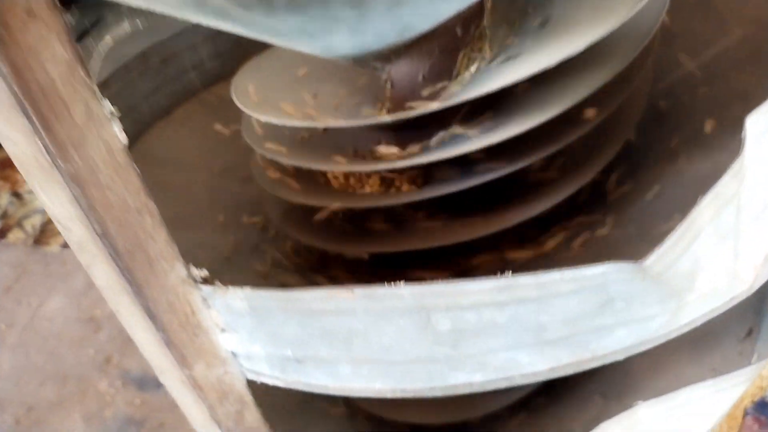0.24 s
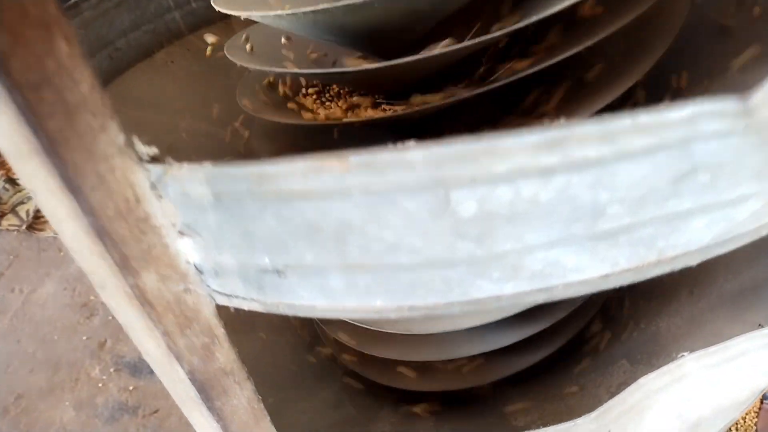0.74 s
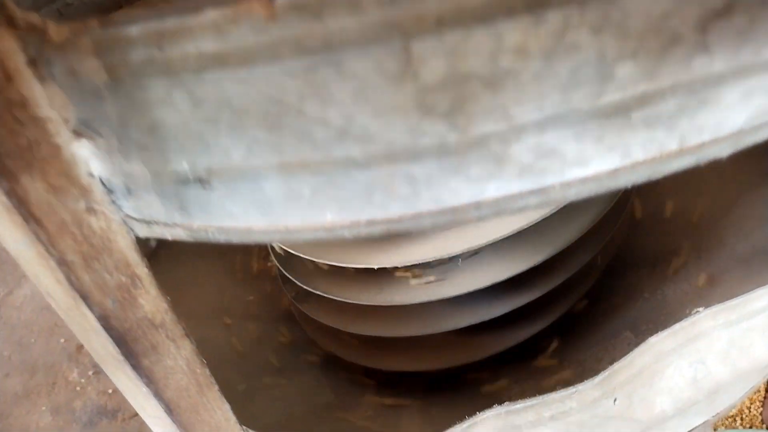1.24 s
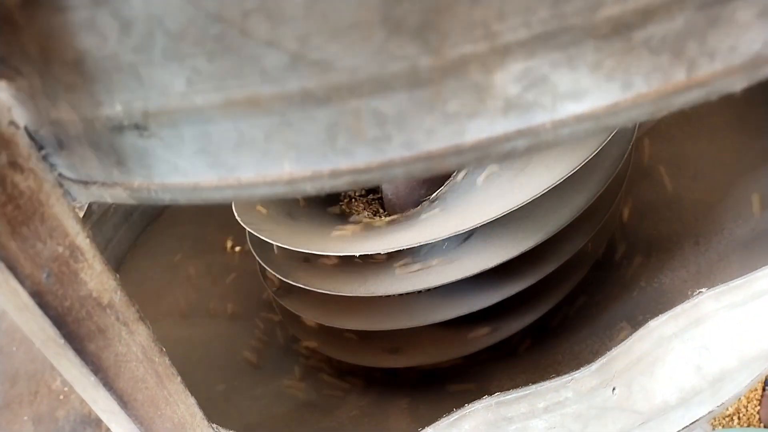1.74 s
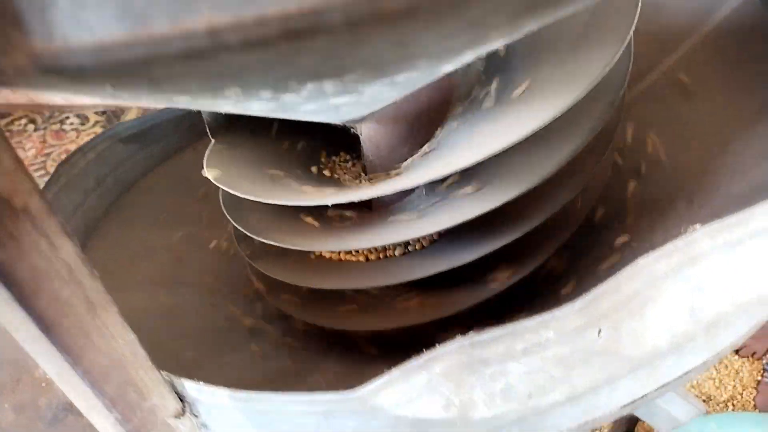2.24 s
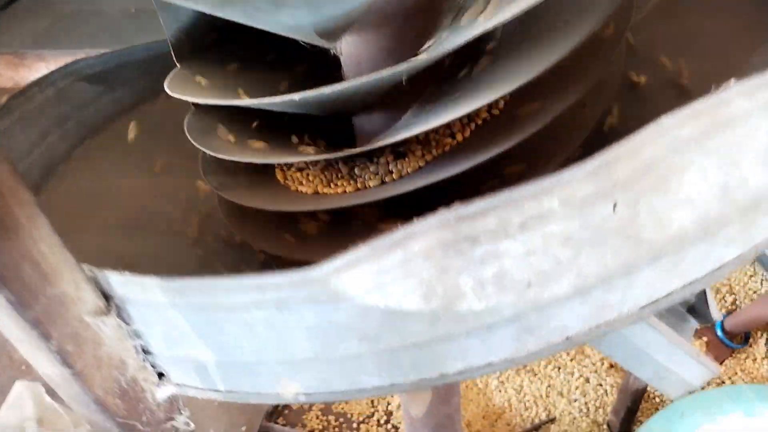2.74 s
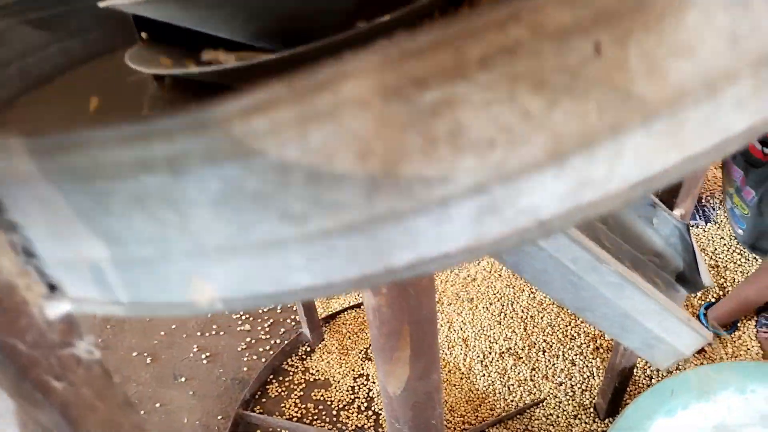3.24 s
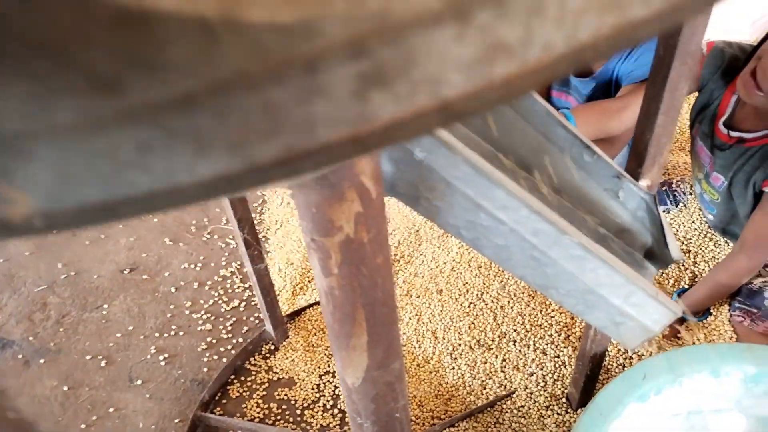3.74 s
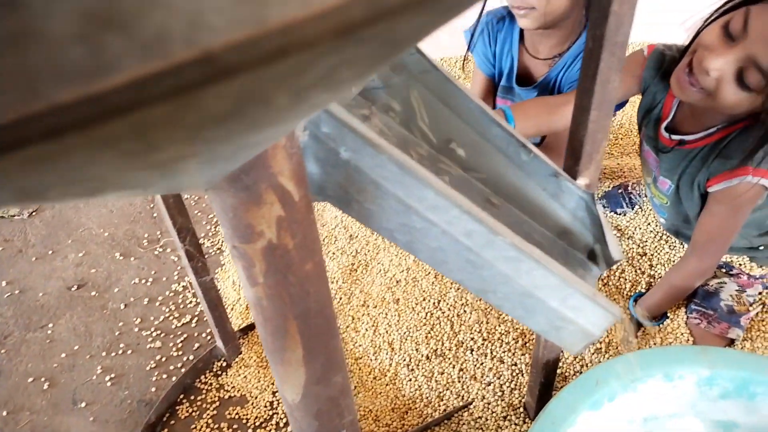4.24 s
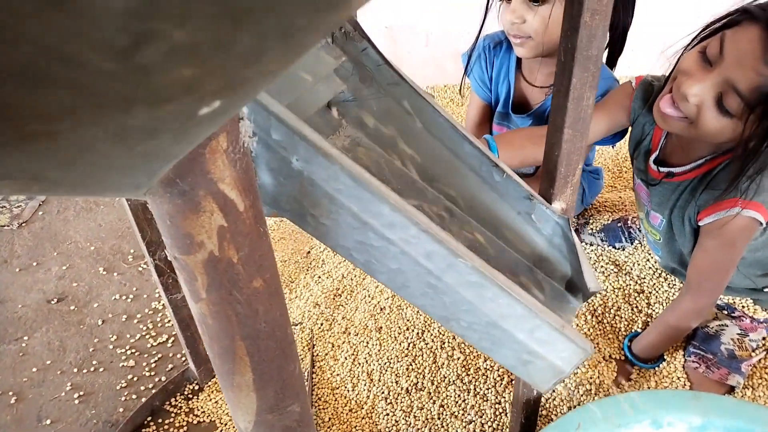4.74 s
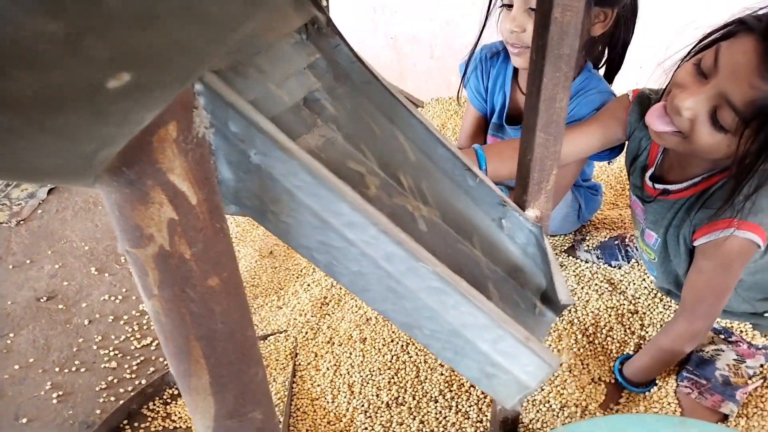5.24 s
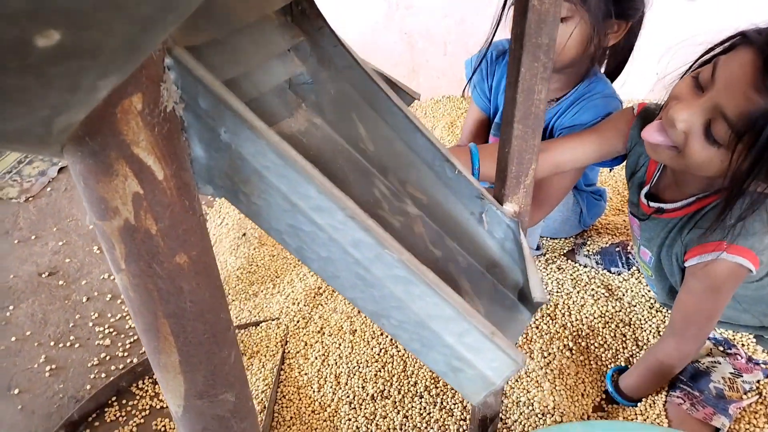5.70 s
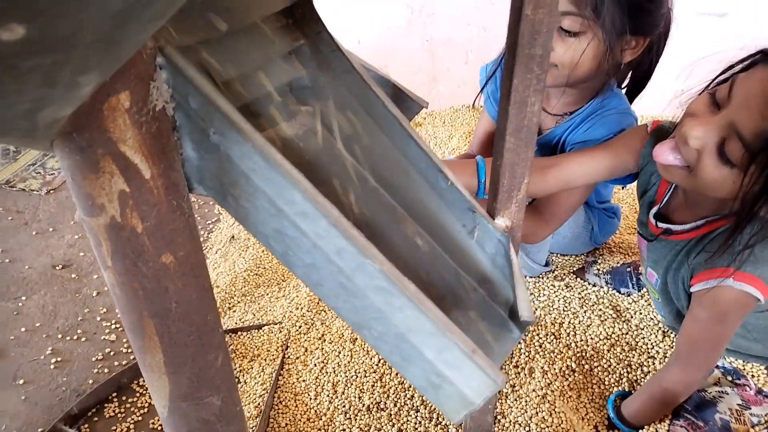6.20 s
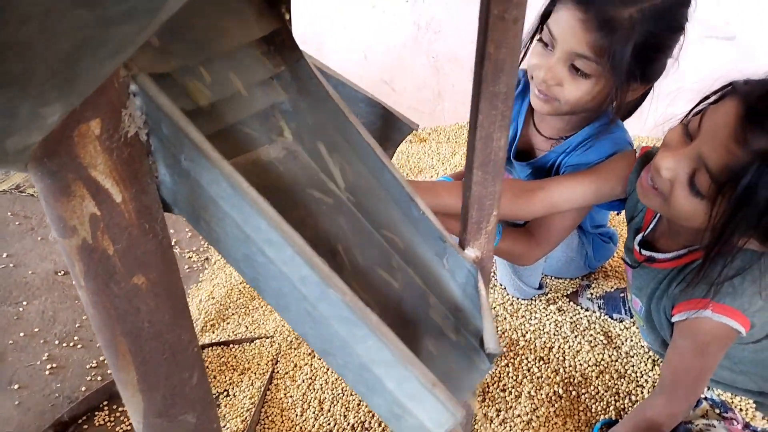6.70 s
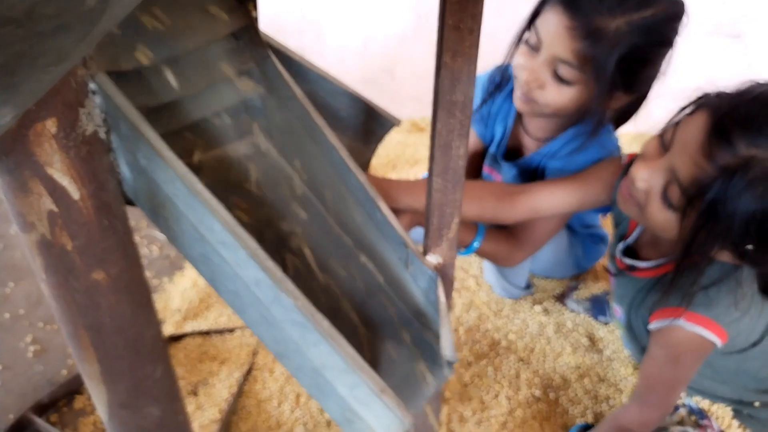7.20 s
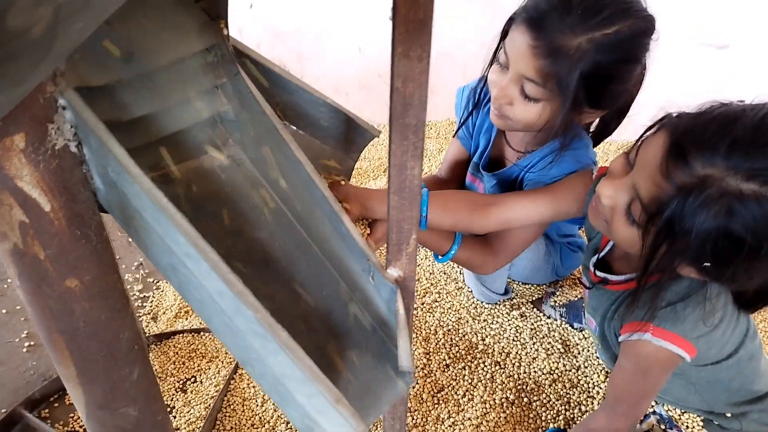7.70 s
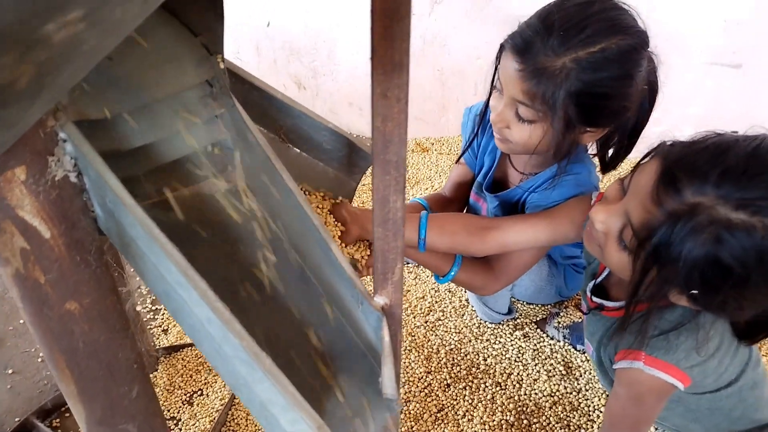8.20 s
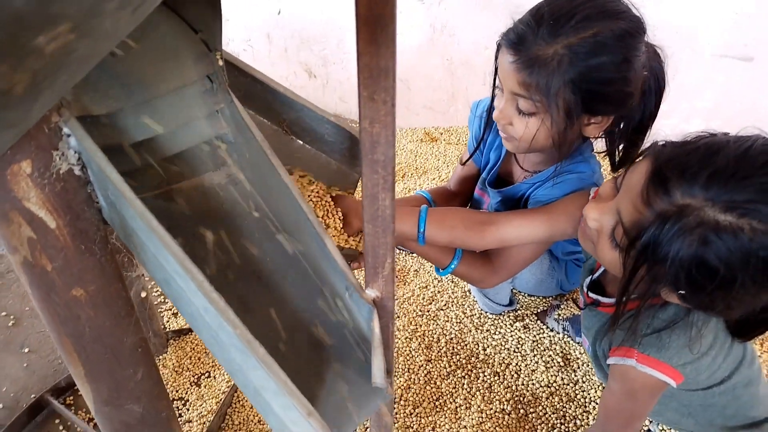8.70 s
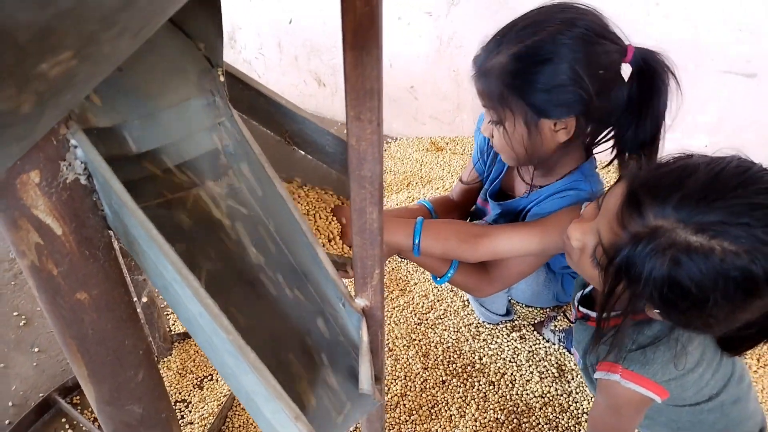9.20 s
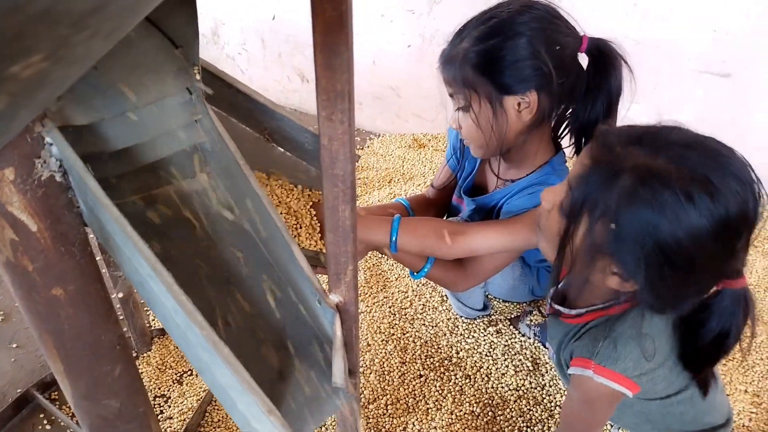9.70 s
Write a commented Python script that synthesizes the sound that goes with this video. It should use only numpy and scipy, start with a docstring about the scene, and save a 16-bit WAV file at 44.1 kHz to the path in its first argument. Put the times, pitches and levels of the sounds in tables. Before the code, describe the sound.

A dense continuous roar of hard beans striking and sliding on thin metal, heard close up, with a faint low hum and brief thin tones.

```python
"""At a sheet-metal spiral sorter: dry beans pour down, hit its drum and slide along a chute onto a heap.
A handheld phone looks into the drum, sinks past its outer wall and ends facing the chute.
Coloured random impacts, 30000 a second, merge into a rush with wandering echoes and brief level dips.
Resonances fed by impacts make the drum modes; a wavering low sine hums; short thin notes glide upward."""
import sys
import numpy as np
from scipy import signal
from scipy.fft import rfft, irfft
from scipy.io import wavfile
from scipy.ndimage import uniform_filter1d, map_coordinates

SR = 44100
rng = np.random.default_rng(int(sys.argv[2]) if len(sys.argv) > 2 else 0)


def transcribe(u):
    """Save the signal u as a 16-bit wav file named by the first command-line argument.

    u: samples, shape (n,) or (channels, n), limited to [-1, 1]; the rate is SR.
    q: integer samples, one column per channel.
    """
    v = np.clip(np.atleast_2d(u).T, -1, 1)
    q = np.round(v * 32767).astype(np.int16)
    wavfile.write(sys.argv[1], SR, q)


N = 438785  # samples


def undb(db):
    """Amplitude gain of a dB value."""
    return 10 ** (np.asarray(db) / 20)


def unit(x):
    """Scale to rms 1."""
    return x / np.sqrt(np.mean(x ** 2))


def curve(rows):
    """Columns of a timed table, linearly interpolated to one value per sample."""
    knot_s, *columns = np.transpose(rows)
    t = np.arange(N) / SR
    return np.array([np.interp(t, knot_s, column) for column in columns])


def walk(rate_hz):
    """Random levels held 1 / rate_hz, smoothed twice over that time; rms 1."""
    hold = int(SR / rate_hz)
    steps = np.repeat(rng.standard_normal(N // hold + 1), hold)
    smooth = uniform_filter1d(uniform_filter1d(steps, hold), hold)
    return unit(smooth[:N])


def colour(x, *shapes):
    """Minimum-phase filter: dB spectra summed over log frequency, made causal by folding the cepstrum."""
    size = 8192
    bins_hz = np.maximum(np.arange(size // 2 + 1) * SR / size, 1)
    gain_db = sum(np.interp(np.log(bins_hz), np.log(hz), db) for hz, db in shapes)
    cepstrum = irfft(gain_db * np.log(10) / 20)
    cepstrum[1:size // 2] *= 2
    cepstrum[size // 2 + 1:] = 0
    response = irfft(np.exp(rfft(cepstrum)))
    return signal.fftconvolve(x, response)[:N]


def ring(x, hz, width_hz):
    """One resonance, applied twice for steep skirts; width_hz is that of a single pass."""
    b, a = signal.iirpeak(hz, hz / width_hz, fs=SR)
    once = signal.lfilter(b, a, x)
    return signal.lfilter(b, a, once)


BEANS_PER_S = 30000


def beans(scatter_db):
    """Impacts at random instants, each with its own strength, pushing the sheet in or out."""
    hit = rng.random(N) < BEANS_PER_S / SR
    strength = undb(scatter_db * rng.exponential(size=N))
    push = np.tanh(rng.standard_normal(N))
    return hit * strength * push


# Treble colour of the phone's microphone port, whatever it faces: f/Hz, level/dB
PHONE = [(2500, -0.5), (2900, -3), (3600, -3), (4400, -5), (4750, -7.5), (6000, -9.5), (6800, -8),
         (7450, -5.5), (7800, -7.5), (8500, -14.5), (9200, -19), (10000, -22), (14000, -28), (15400, -30)]


def part(shape, clump_db, corner_hz):
    """Beans on one metal part; they arrive in clumps, which modulate only the treble ticks."""
    blows = beans(scatter_db=1.5)
    highpass = signal.butter(N=2, Wn=corner_hz, btype="high", fs=SR, output="sos")
    ticks = signal.sosfilt(highpass, blows)
    clumps = undb(clump_db * (walk(24) + .5 * walk(70)))
    clumped = blows + (clumps - 1) * ticks
    return unit(colour(clumped, shape, np.transpose(PHONE)))


# Relative colour of impacts on each part: f/Hz, then density/(dB per Hz) for spiral, rim, wall, chute
PARTS = [(20, -50, -52, -55, -51), (100, -25, -28, -29, -29), (187, -22.5, -24, -21.5, -26.5),
         (335, -9, -13, -9, -10.5), (423, -12.5, -11.5, -13, -11), (700, -10.5, -7.5, -7.5, -7.5),
         (840, -4.5, -4, -5.5, -4.5), (1010, -5, -8, -4.5, -5.5), (1220, -1, -2.5, -2, -4),
         (1720, -1, -1.5, -1, -3.5), (2500, -2, -2.5, -1.5, -2), (5000, -0.5, -2.5, -2, -2),
         (9000, -0.5, -2.5, -2.5, -2), (15400, -1.5, -3, -1.5, 0)]


def metal_parts():
    """Independent bean rain on each part, filtered by that part's spectrum."""
    hz, *colours_db = np.transpose(PARTS)
    return [part((hz, db), clump_db=0.6, corner_hz=4500) for db in colours_db]


# Where the phone looks as the hand sinks: t/s, view (0 spiral, 1 rim, 2 wall, 3 chute)
VIEW = [(0, 0.3), (1, -0.2), (2.2, 0), (2.7, 0.7), (3.3, 1.12), (4, 1.8), (5.5, 2), (7.4, 2.5), (8.2, 3),
        (9.95, 3)]
ASIDE_DB = -11  # one step off the view, before floor and normalising
FAR_DB = -16  # floor under every part, before normalising


def facing():
    """Power share of each part: strongest where the phone looks, falling off to either side."""
    steps_aside = curve(VIEW) - np.arange(4)[:, None]
    power = undb(ASIDE_DB * steps_aside ** 2) ** 2 + undb(FAR_DB) ** 2
    return power / power.sum(axis=0)


def bounces(x, lags_s, sway, echo_db):
    """Echoes off nearby metal and ground; paths sway with the hand, so faint combs wander."""
    out = x
    for lag_s in lags_s:
        read_at = np.arange(N) - SR * lag_s * (1 + sway * walk(1.5))
        echo = map_coordinates(x, [read_at], order=3, mode="mirror")
        out = out + undb(echo_db) * echo
    return unit(out)


# Loudness of the whole rush at the phone, before dips: t/s, level/dB
RUSH = [(0.0, -16), (2.4, -16.5), (6.9, -18), (9.95, -17.5)]
# Sudden drops in level that then recover: t/s, depth/dB
DIPS = [(0.735, 3), (2.434, 0.5), (2.503, 2)]
RECOVER_S = 0.068  # time constant


def flow_db():
    """Slow level of the rush, less sudden dips that decay exponentially in dB."""
    t = np.arange(N) / SR
    db = curve(RUSH)[0]
    for start_s, depth_db in DIPS:
        db = db - depth_db * (t >= start_s) * np.exp(-np.abs(t - start_s) / RECOVER_S)
    return db


def rush(share):
    """Bean rain of all parts, cross-faded in power, with echoes and the level of the flow."""
    direct = sum(np.sqrt(power) * sound for power, sound in zip(share, metal_parts()))
    echoed = bounces(direct, lags_s=(.0009, .0019, .0043, .0071), sway=0.1495, echo_db=-25)
    return undb(flow_db()) * echoed


# Broad drum modes: f/Hz, single-pass width/Hz, then level/dB facing spiral, rim, wall, chute
DRUM = [(156.4, 11, -53, -59, -69, -63), (169.5, 14, -54, -62, -66, -62), (256, 10, -70, -51, -43.5, -51),
        (297.4, 22, -48, -62, -49, -50.5), (398, 32, -44.5, -42, -46, -49),
        (602.7, 58, -39.5, -42, -43.5, -49), (657, 34, -48.5, -41.5, -42.5, -44),
        (1437, 230, -30, -27.5, -32.5, -30.5), (2156, 250, -39, -53, -32.5, -40)]


def drum(share):
    """Bean rain feeds each mode; its loudness follows the side of the drum that is faced."""
    out = 0
    for hz, width_hz, *levels_db in DRUM:
        mode = unit(ring(beans(scatter_db=1.5), hz, width_hz))
        level = np.sqrt(undb(levels_db) ** 2 @ share)
        out = out + mode * level
    return out


# Strength of the narrow low mode, before its waver: t/s, level/dB rms
HUM = [(0, -55.5), (2.3, -55), (2.85, -42.5), (3.45, -56), (3.65, -46.5), (4.25, -56), (4.6, -48.5),
       (5.35, -58), (5.75, -49), (6.1, -56), (6.7, -58), (6.98, -44), (7.3, -51), (8.25, -48), (9.3, -53),
       (9.95, -54)]
HUM_HZ = 213.3  # mean pitch


def hum():
    """A long-ringing mode: a near sine whose pitch and strength waver."""
    pitch_hz = HUM_HZ + 2.35 * walk(15)
    phase = 2 * np.pi * np.cumsum(pitch_hz) / SR
    level_db = curve(HUM)[0] + 3.8 * walk(11)
    return np.sqrt(2) * undb(level_db) * np.sin(phase)


# Thin whistle-like notes: start t/s, length t/s, start f/Hz before waver, level/dB rms before soft ends
TONE = [(.52, .13, 1286, -29), (1.521, .11, 1218, -30), (3.0, .13, 1448, -29), (3.97, .14, 1368, -29),
        (4.25, .233, 1410, -24.5), (4.71, .13, 1441, -26), (4.93, .39, 1455, -27),
        (5.48, .103, 1520, -25.5), (7.44, .13, 1525, -29)]
CLIMB_HZ_PER_S = 74.4


def tone():
    """Near-sine notes with soft ends and a slight waver, each gliding upward."""
    out = np.zeros(N)
    waver_hz = 4 * walk(20)
    for start_s, length_s, hz, db in TONE:
        a, b = int(start_s * SR), int((start_s + length_s) * SR)
        glide_hz = hz + CLIMB_HZ_PER_S * np.arange(b - a) / SR
        phase = 2 * np.pi * np.cumsum(glide_hz + waver_hz[a:b]) / SR
        fade = signal.windows.tukey(b - a, .25)
        out[a:b] += np.sqrt(2) * undb(db) * np.sin(phase) * fade
    return out


def scene():
    """Rush and drum follow the phone's view; one microphone feeds both channels."""
    share = facing()
    mono = rush(share) + drum(share) + hum() + tone()
    return np.array([mono, mono])


TOP_HZ = 15440


def record(dry):
    """The phone rounds the loudest peaks and cuts the top."""
    rounded = np.tanh(.4 * dry) / .4
    lowpass = signal.ellip(16, .2, 80, TOP_HZ, fs=SR, output="sos")  # order, ripple/dB, stopband/dB
    return signal.sosfilt(lowpass, rounded)


dry = scene()
out = record(dry)
transcribe(out)
```